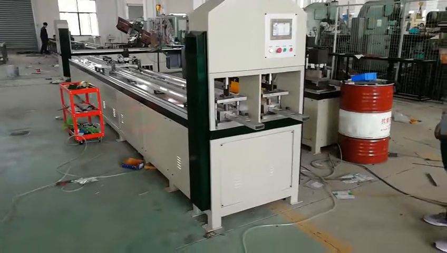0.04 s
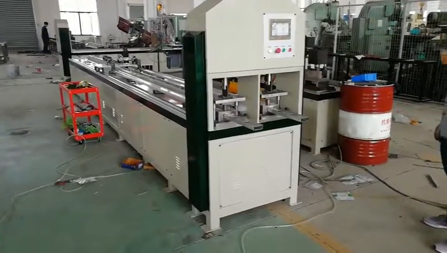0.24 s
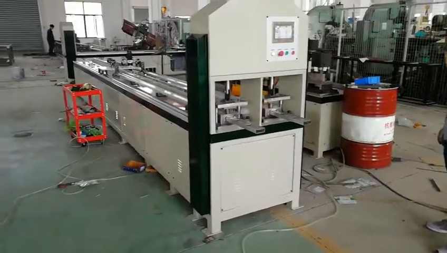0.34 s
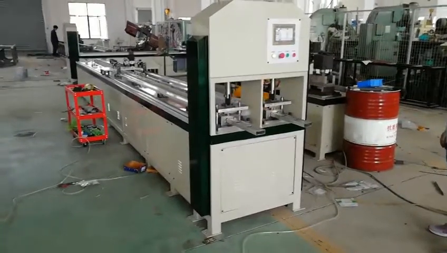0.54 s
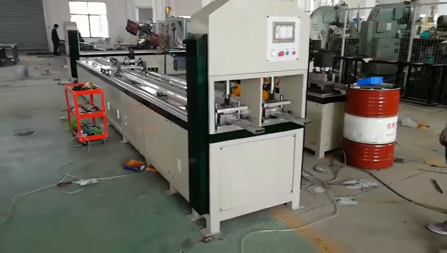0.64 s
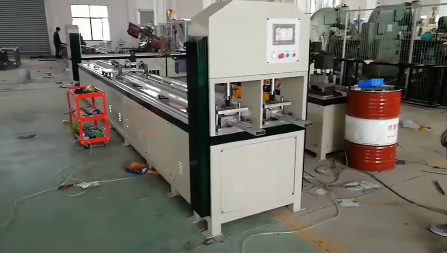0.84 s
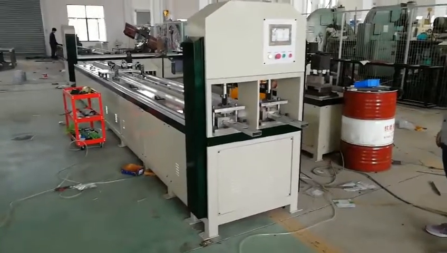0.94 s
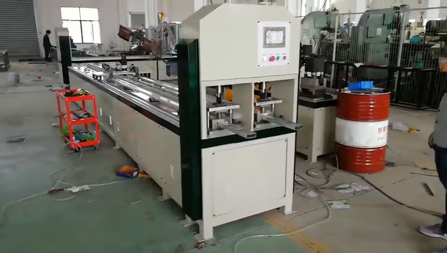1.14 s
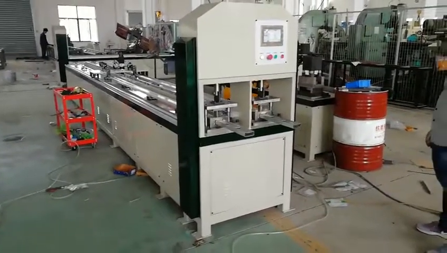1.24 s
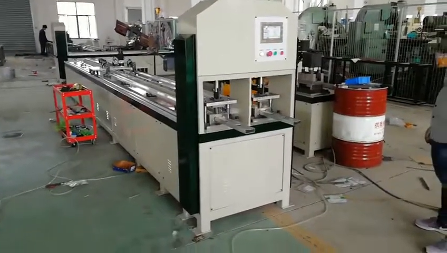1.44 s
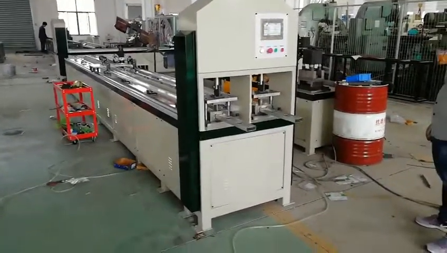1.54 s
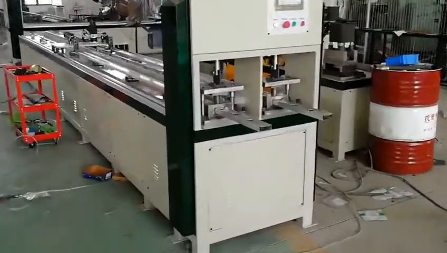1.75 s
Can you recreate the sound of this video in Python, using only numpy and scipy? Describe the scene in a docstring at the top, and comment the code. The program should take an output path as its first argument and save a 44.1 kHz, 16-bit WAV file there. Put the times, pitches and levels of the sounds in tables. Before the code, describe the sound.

A hydraulic press punches a steel pipe with two heavy, clanging blows and a low shudder. The pipe then slides, bumps a stop, and squeaks and clinks onward, slightly to the left in a large, echoing workshop where machines drone.

```python
"""A hydraulic press punches a steel pipe, a little to the left, in a large workshop where machines drone.
After a faint tap the clamp knocks shut; two heavy blows crack, clang and thud, and the frame shudders.
From 0.6 s the pipe slides along its guide, friction making it hiss and squeak; near 1 s it bumps the stop.
Drawn on, it scrapes, squeaks, chatters and clinks as its wall resonates. The hall echoes press and pipe."""
import sys
import numpy as np
from scipy import signal
from scipy.fft import rfft, irfft
from scipy.io import wavfile

SR = 44100
rng = np.random.default_rng(int(sys.argv[2]) if len(sys.argv) > 2 else 0)


def persist_wave(psi):
    """Save psi, clipped to +-1, as 16-bit WAV."""
    counts = np.round(np.clip(psi, -1, 1) * 32767).astype(np.int16)
    wavfile.write(sys.argv[1], SR, np.atleast_2d(counts).T)


N = 79380
T, HZ = np.arange(N) / SR, np.fft.rfftfreq(N, 1 / SR)


def amp(db):
    """Decibels to gain."""
    return 10 ** (np.asarray(db) / 20)


def unit(x):
    """Scales to rms 1."""
    return x / np.sqrt(np.mean(x ** 2) + 1e-20)


def read(points, hz=HZ):
    """Reads a table on a log-frequency axis."""
    f, value = np.transpose(points)
    return np.interp(np.log(hz + 1), np.log(f + 1), value)


def level(points):
    """Gain over time from (s, dB) points."""
    return amp(np.interp(T, *np.transpose(points)))


def colour(x, db):
    """Filters by a gain in dB per frequency."""
    return irfft(rfft(x) * amp(db), N)


def envelope(start, rise_s, hold_s, t60_s):
    """Linear rise; exponential decay from hold_s after the start."""
    return np.clip((T - start) / rise_s, 0, 1) * amp(-60 * np.maximum(T - start - hold_s, 0) / t60_s)


def waver(band_hz):
    """Smooth random movement of rms 1."""
    return unit(irfft(rfft(rng.standard_normal(N)) * np.exp(-(HZ / band_hz) ** 2), N))


# Diffuse sound field. Each row: frequency in Hz, left-right coherence.
COHERENCE = [(100, 0.99), (250, 0.93), (500, 0.05), (1000, 0.24), (2000, 0.29), (8000, 0.058)]


def pair(x):
    """Makes two unrelated signals as alike as diffuse sound at two close points."""
    a, b = rfft(x)
    alike = read(COHERENCE)
    return irfft(np.array([a, alike * a + np.sqrt(1 - alike ** 2) * b]), N)


def noise(spectrum):
    """Stereo noise of a given spectral shape, rms 1."""
    return unit(colour(pair(rng.standard_normal((2, N))), read(spectrum)))


def ring(start, modes):
    """Struck modes decay; left and right differ in phase where coherence is low."""
    out, first = np.zeros((2, N)), round(start * SR)
    t = T[:N - first]
    for hz, db, t60 in modes:
        phase = rng.uniform(-np.pi, np.pi, (2, 1)) * (1 - read(COHERENCE, hz))
        onset = np.minimum(t * hz / 2, 1)
        out[:, first:] += onset * amp(db - 60 * t / t60) * np.sin(2 * np.pi * hz * t + phase)
    return out


# Workshop drone. Each row: time in seconds, level in dB.
DRONE_LEVEL = [(0, -37), (.6, -35.5), (1.35, -40.5), (1.58, -39), (1.7, -35), (1.8, -35)]
# Each row: frequency in Hz, relative density in dB.
DRONE_SPECTRUM = [(25, -12), (70, -1.5), (166, 3), (350, -5), (860, -7), (2400, -12.5), (6000, -14),
                  (8500, -15.5), (11000, -30.5)]


def drone():
    """Other machines run in the hall."""
    return level(DRONE_LEVEL) * noise(DRONE_SPECTRUM)


# Hall decay. Each row: frequency in Hz, T60 in seconds.
HALL_T60 = [(150, 1.45), (1000, 1.1), (8000, 1.05), (15000, 0.76)]


def hall(x, delay_s=0.0087):
    """Diffuse echo of the workshop, the treble dying first."""
    hz, t, bins = signal.stft(pair(rng.standard_normal((2, N))), SR, nperseg=256)
    decay = amp(-60 * t / read(HALL_T60, hz)[:, None])
    tail = signal.istft(bins * decay, SR, nperseg=256)[1][:, :N]
    tail *= np.clip(T / delay_s - 1, 0, 1)
    return signal.fftconvolve(x, tail / np.linalg.norm(tail[0]), axes=1)[:, :N]


# Frame shudder. Each row: time in seconds, level in dB.
SHUDDER_LEVEL = [(.22, -43), (.3, -31.5), (.42, -27), (.54, -25), (.67, -26), (.71, -30.5), (.9, -38),
                 (1.14, -58)]
# Each row: frequency in Hz, relative density in dB.
SHUDDER_SPECTRUM = [(30, -29), (70, -10.5), (120, -9.5), (180, 0.5), (260, -4.5), (360, -2.5), (460, -24.5),
                    (1000, -25), (3000, -72)]


def shudder(depth_db=2):
    """The heavy frame rumbles unevenly through the stroke."""
    rumble = noise(SHUDDER_SPECTRUM) * amp(depth_db * np.tanh(waver(band_hz=14)))
    return level(SHUDDER_LEVEL) * unit(rumble)


# Pipe wall resonances. Each row: frequency in Hz, width in Hz, gain in dB.
WALL_RESONANCES = [(2464, 226, 10), (8513, 69, 10.5), (9080, 74, 13.5), (13460, 110, 15), (14340, 110, 18),
                   (15150, 110, 7)]


def friction(spectrum, resonances=WALL_RESONANCES, slips_per_s=5000, spread_db=1.5):
    """Dense tiny slips of uneven size excite the pipe wall."""
    slipping = rng.random(N) < slips_per_s / SR
    sizes = amp(spread_db * np.minimum(rng.exponential(1, N), 4))
    slips = pair(slipping * sizes * rng.standard_normal((2, N)))
    wall = 1 + sum(amp(db) / (1 + 2j * (HZ - hz) / width) for hz, width, db in resonances)
    return unit(colour(irfft(rfft(slips) * wall, N), read(spectrum)))


# Pipe sliding. Each row: time in seconds, level in dB.
SLIDE_LEVEL = [(.62, -76), (.7, -34.5), (.76, -34.5), (.84, -37.5), (.875, -28.5), (.92, -32), (1.005, -39),
               (1.04, -65)]
# Each row: frequency in Hz, relative density in dB.
SLIDE_SPECTRUM = [(400, -6), (1300, 0), (2500, 1), (5000, -2), (6500, -2), (7800, 4.5), (10500, -4),
                  (12000, -20), (15500, -28)]


def slide():
    """Light friction along the guide only hisses."""
    return level(SLIDE_LEVEL) * friction(SLIDE_SPECTRUM, resonances=[])


# Pipe scrapes. Each row: start in seconds, length in seconds, level in dB.
SCRAPES = [(0.644, 0.028, -33.5), (.695, 0.041, -28), (1.139, 0.03, -25.5), (1.173, 0.063, -37.5),
           (1.2875, 0.016, -27), (1.766, 0.052, -37)]
# Each row: frequency in Hz, relative density in dB.
SCRAPE_SPECTRUM = [(900, -29), (1400, -5), (2600, -6), (3700, -2), (5200, -8), (7000, -6), (8200, -4),
                   (9800, -16.5), (15000, -33)]


def scrapes(rise_s=0.0056, t60_s=0.23):
    """Short, harder rubs make the wall ring."""
    strokes = sum(amp(db) * envelope(start, rise_s, length, t60_s) for start, length, db in SCRAPES)
    return strokes * friction(SCRAPE_SPECTRUM)


# Bursts of chatter. Each row: start in seconds, length in seconds, level in dB.
CHATTERS = [(1.133, 0.023, -40), (1.305, .03, -37), (1.416, 0.038, -37)]
# Each row: frequency in Hz, relative density in dB.
CHATTER_SPECTRUM = [(5000, -18), (9500, 5), (12500, -25), (13500, -8), (15400, 4), (16200, -18)]


def chatter(swell_share=0.8, t60_s=0.2):
    """The pipe chatters on its guide: a swelling shimmer of the wall's highest resonances."""
    swells = sum(amp(db) * envelope(start, swell_share * length, length, t60_s)
                 for start, length, db in CHATTERS)
    return swells * friction(CHATTER_SPECTRUM)


# Pipe squeaks. Each row: start in seconds, length in seconds, pitch in Hz, relative level in dB.
SQUEAKS = [(0.638, 0.03, 8980, -28.5), (0.69, 0.055, 2440, -22), (0.747, 0.036, 3650, -21),
           (0.869, 0.069, 2405, -24.5), (0.89, 0.047, 6260, -26.5), (0.967, 0.029, 3160, -25),
           (1.148, 0.024, 8985, -18), (1.181, 0.014, 8400, -17.5), (1.215, 0.064, 8410, -28),
           (1.237, 0.024, 5920, -26), (1.305, 0.038, 8980, -17.5), (1.305, 0.024, 8490, -16),
           (1.312, 0.037, 2450, -29), (1.348, 0.024, 5900, -14.5), (1.358, 0.026, 5690, -25),
           (1.392, 0.038, 5560, -25.5), (1.47, 0.024, 8400, -16), (1.49, 0.06, 5910, -26),
           (1.569, 0.034, 8465, -26), (1.713, 0.057, 6280, -36), (1.768, 0.025, 2450, -32)]
# Rasp. Each row: pitch in Hz, noisy share of the power.
SQUEAK_ROUGHNESS = [(3700, .5), (5600, .06)]


def squeaks(swell_share=0.8, t60_s=0.17, rasp_hz=150):
    """A rubbed pipe mode swells, then rings out; low squeaks rasp, shrill ones are nearly pure."""
    out = np.zeros((2, N))
    for start, length, hz, db in SQUEAKS:
        rough = read(SQUEAK_ROUGHNESS, hz)
        grip = np.sqrt(1 - rough) + np.sqrt(rough / 2) * (waver(rasp_hz) + 1j * waver(rasp_hz))
        phase = 2 * np.pi * hz * T + rng.uniform(-1.3, 1, (2, 1))
        tone = (grip * np.exp(1j * phase)).real / 2
        out += amp(db) * tone * envelope(start, swell_share * length, length, t60_s)
    return out


# Pipe striking its guide. Each row: start in seconds, level in dB.
CLINKS = [(1.145, -27), (1.2888, -27), (1.318, -27), (1.4418, -24), (1.456, -25), (1.606, -32.5),
          (1.693, -39.5)]
# Contact tick. Each row: frequency in Hz, relative density in dB.
TICK_SPECTRUM = [(3000, -45), (6500, -5.5), (8500, 1.5), (10000, -14), (12300, -31)]
# Pipe modes. Each row: frequency in Hz, relative level in dB, T60 in seconds.
PIPE_MODES = [(5640, -15, 0.56), (5918, -10.5, 0.57), (6290, -13.5, 0.72), (8500, -1.5, 0.19),
              (8987, -5.5, 0.44), (15149, -26, 0.27)]


def clinks(tick_db=5, flutter_depth=0.45, flutter_hz=50):
    """A bright tick sets the pipe's modes ringing; each flutters as the pipe shifts on its guide."""
    contacts = sum(amp(db) * envelope(start, rise_s=0.002, hold_s=0, t60_s=0.06) for start, db in CLINKS)
    out = amp(tick_db) * friction(TICK_SPECTRUM) * contacts
    for mode in PIPE_MODES:
        flutter = 1 + flutter_depth * (waver(flutter_hz) + 1j * waver(flutter_hz))
        ringing = sum(amp(db) * ring(start, [mode]) for start, db in CLINKS)
        out += (flutter * signal.hilbert(ringing)).real / np.hypot(1, flutter_depth)
    return out


# Jaw grind. Each row: frequency in Hz, relative density in dB.
CLAMP_SPECTRUM = [(450, -15), (800, 4), (1300, 6), (2400, -1.5), (2900, -8), (7800, -14.5), (10500, -38)]
# Jaw ping. Each row: frequency in Hz, relative level in dB, T60 in seconds.
CLAMP_MODES = [(2274, 3, 0.12)]


def clamp(start_s=0.2225, level_db=-24):
    """The jaws ping and grind shut on the pipe just before the first heavy blow."""
    grind = noise(CLAMP_SPECTRUM) * envelope(start_s, rise_s=0.0016, hold_s=0.024, t60_s=0.18)
    return amp(level_db) * (grind + ring(start_s, CLAMP_MODES))


# A tap, two heavy blows, a double bump. Each row: start in seconds, crack, clang and thud levels in dB.
BLOWS = [(0.14, -41, -39.5, -56), (0.2526, -12, -15.5, -20), (0.4445, -13.5, -20, -26.5),
         (.955, -59, -34.5, -27.5), (.995, -54, -35.5, -28.5)]
# The three parts of a blow. Each row: frequency in Hz, relative density in dB.
CRACK_SPECTRUM = [(200, 3), (700, 5), (3500, 4.5), (6300, 0.5), (7700, 3), (10000, -13), (13500, -14.5),
                  (16000, -29)]
CLANG_SPECTRUM = [(150, -21), (450, 2), (650, 5.5), (1300, 3.5), (2300, 0), (3100, -6), (5000, -9),
                  (8000, -22), (14000, -39)]
THUD_SPECTRUM = [(25, -17), (50, -13), (80, 2), (200, -2.5), (350, -4.5), (900, -46)]
# Modes of frame and die. Each row: frequency in Hz, relative level in dB, T60 in seconds.
FRAME_MODES = [(169, -17.5, 1.76), (222.8, -10.5, 0.51), (352.2, -15, 1.6), (560.5, -10, 0.4),
               (615.6, -11.5, 0.79), (1302, -15, 0.61), (1735, -5, 0.25)]
DIE_MODES = [(846, 2, 0.081), (1174, -5.5, 0.22), (1228, -6, .3), (1450, -7.5, 0.3), (1504, -11, 0.31),
             (1739, -0.5, 0.23), (1815, -4, 0.25)]


def press(die_start_s=0.4444, die_db=-19):
    """Steel cracks, panels and frame clang over a low thud; the second heavy blow also rings the die."""
    crack, clang, thud = noise(CRACK_SPECTRUM), noise(CLANG_SPECTRUM), noise(THUD_SPECTRUM)
    out = np.zeros((2, N))
    for start, crack_db, clang_db, thud_db in BLOWS:
        out += amp(crack_db) * crack * envelope(start, rise_s=0.0016, hold_s=0.0058, t60_s=0.049)
        panels = clang * envelope(start, rise_s=0.007, hold_s=0.0035, t60_s=0.38)
        out += amp(clang_db) * (panels + ring(start, FRAME_MODES))
        out += amp(thud_db) * thud * envelope(start, rise_s=0.026, hold_s=0.021, t60_s=0.27)
    return out + amp(die_db) * ring(die_start_s, DIE_MODES)


def pan(x, balance):
    """Sets the left-right balance, frequency by frequency."""
    return colour(x, np.array([read(balance), -read(balance)]) / 2)


# Balance of direct and diffuse sound. Each row: frequency in Hz, left minus right in dB.
DIRECT_BALANCE = [(300, 0), (600, 7), (1200, 6), (2500, 6.5), (4500, -2), (6000, 5), (8300, 12.5)]
DIFFUSE_BALANCE = [(250, -0.5), (600, 6), (1500, 3), (3000, -1), (9000, 1)]


def scene(press_send_db=-6.5, pipe_send_db=-9.5, right_lag_s=0.00009):
    """Press and pipe to the left, their echo, and the drone of the workshop."""
    blows = press() + clamp()
    pipe = slide() + scrapes() + squeaks() + chatter() + clinks()
    echo = hall(amp(press_send_db) * blows + amp(pipe_send_db) * pipe)
    direct = pan(blows + pipe + shudder(), DIRECT_BALANCE)
    direct[1] = irfft(rfft(direct[1]) * np.exp(-2j * np.pi * HZ * right_lag_s), N)
    return direct + pan(echo + drone(), DIFFUSE_BALANCE)


def record(dry):
    """Clips at full scale, then low-passes at 16.2 kHz."""
    lowpass = signal.firwin(511, 16200, window=("kaiser", 9), fs=SR)
    return signal.oaconvolve(np.clip(dry, -1, 1), lowpass[None], "same")


dry = scene()
out = record(dry)
persist_wave(out)
```